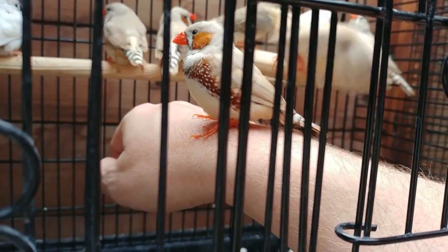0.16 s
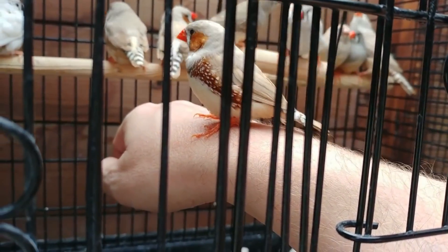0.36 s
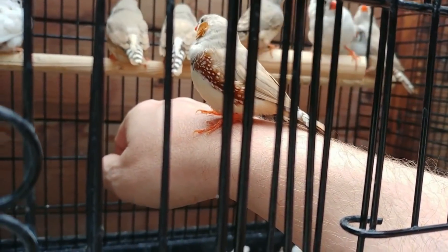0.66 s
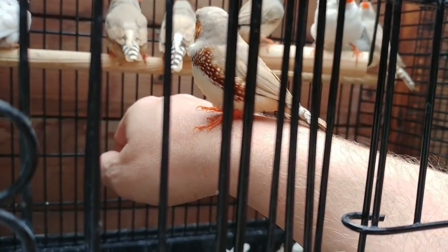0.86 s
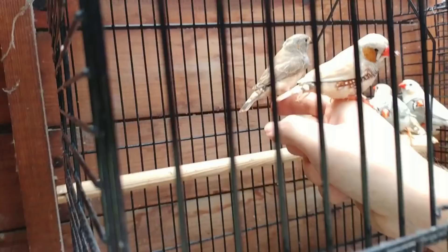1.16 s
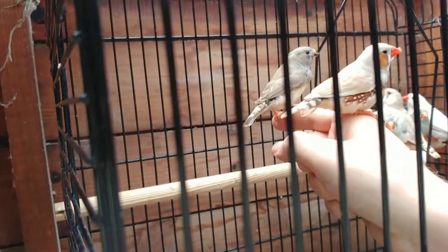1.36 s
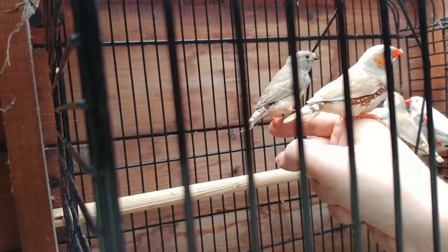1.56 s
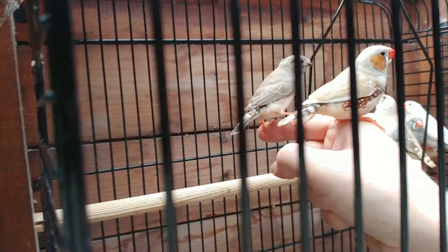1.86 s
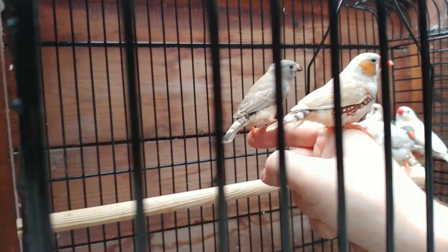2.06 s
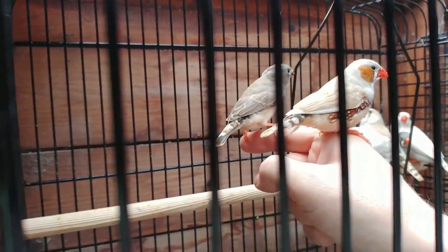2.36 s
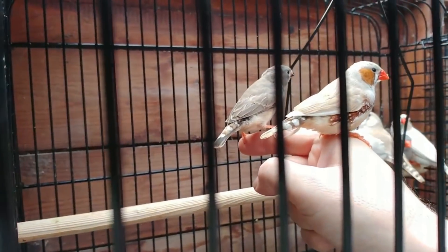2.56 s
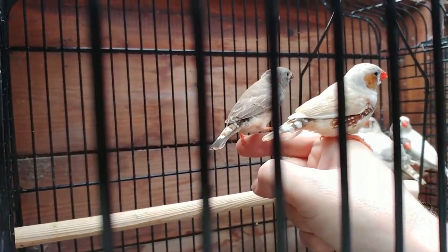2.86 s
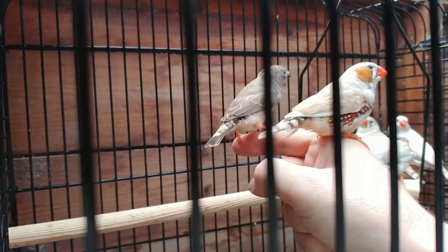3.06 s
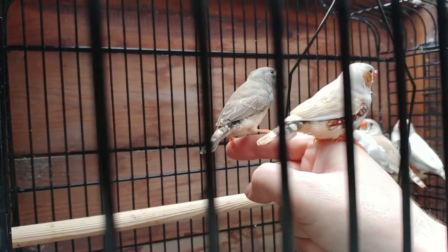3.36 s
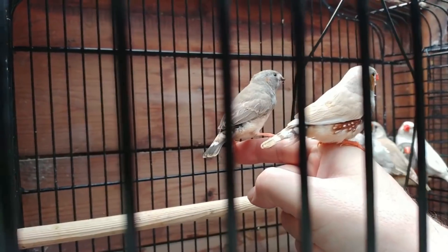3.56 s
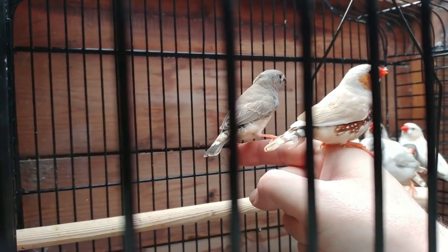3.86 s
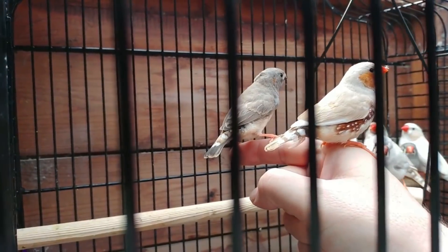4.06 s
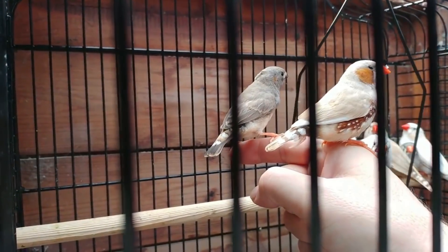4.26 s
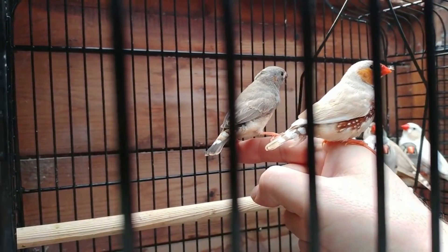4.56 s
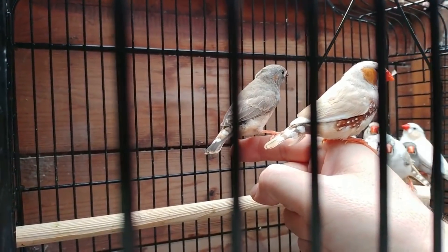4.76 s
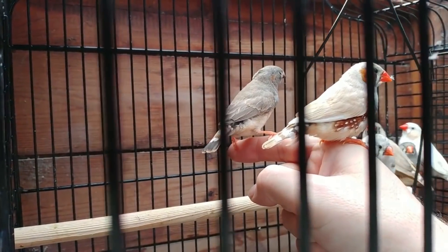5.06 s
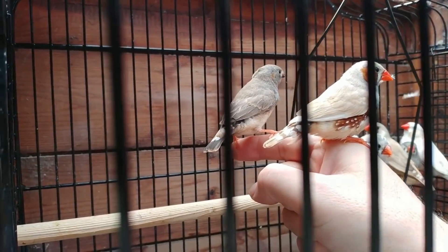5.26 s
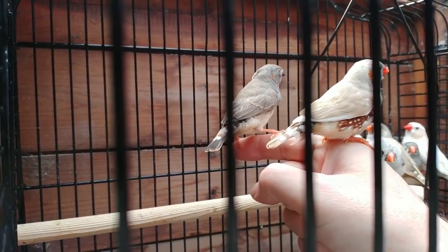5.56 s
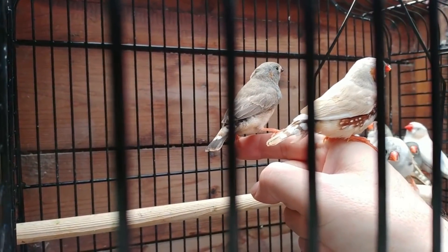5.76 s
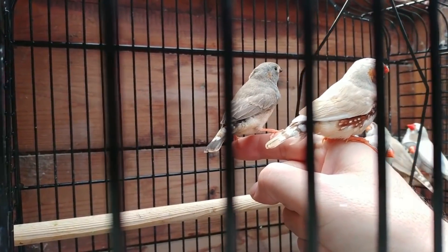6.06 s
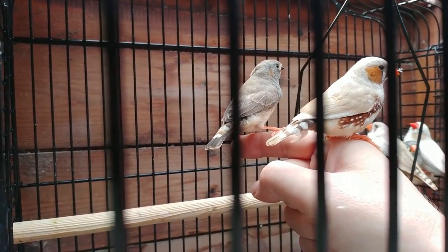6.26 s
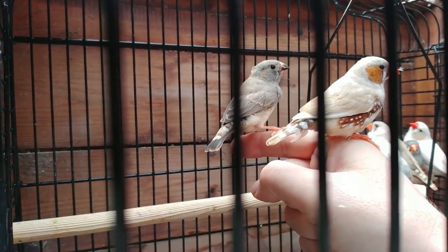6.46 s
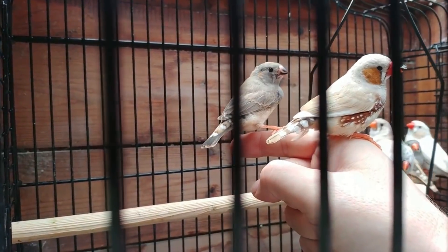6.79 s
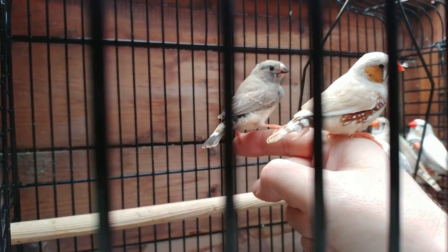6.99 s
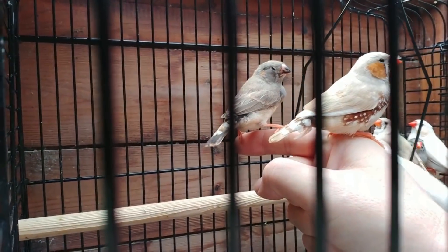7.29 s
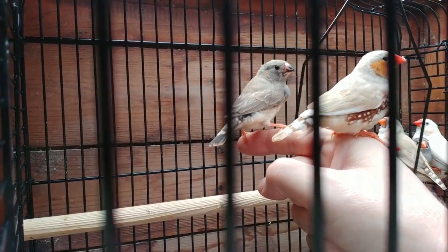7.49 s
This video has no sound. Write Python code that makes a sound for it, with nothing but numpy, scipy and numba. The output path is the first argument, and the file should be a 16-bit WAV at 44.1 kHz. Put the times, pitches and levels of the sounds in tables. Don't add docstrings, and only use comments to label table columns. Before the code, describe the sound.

Close-up zebra finches chatter in uneven bursts of short raspy calls and squeaks, over cage rattles and faint low room rumble.

```python
import sys
import numpy as np
from scipy import signal
from scipy.fft import rfft, irfft, next_fast_len
from scipy.io import wavfile
from numba import njit

SR = 44100
rng = np.random.default_rng(int(sys.argv[2]) if len(sys.argv) > 2 else 0)


def store_pcm(level_fs):
    pcm = np.round(np.clip(level_fs, -1, 1) * 32767).astype(np.int16)
    wavfile.write(sys.argv[1], SR, np.atleast_2d(pcm).T)


def magnitude_from_level(level_db):
    exponent = np.asarray(level_db, float) / 20
    return 10 ** exponent


N = 336483

# start in seconds, level in dB, syrinx pitch in Hz,
# throat resonance in Hz.
BEAT_CALLS = [(2.702, -31.5, 506.4, 2750), (2.836, -29, 656, 3060), (2.979, -26.5, 732.4, 2810),
              (3.123, -29.5, 661, 2730), (3.265, -30.5, 455.6, 3200), (3.401, -33.5, 579, 2590),
              (4.947, -40, 699.5, 2170), (5.111, -41.5, 608, 2080), (5.285, -40.5, 655.3, 2230),
              (5.424, -39, 673, 2300), (5.562, -37.5, 681, 2460), (5.697, -37.5, 673.6, 2600),
              (5.83, -34.5, 691, 2560), (5.966, -32, 813, 2800), (6.064, -40, 553, 2270),
              (6.106, -34.5, 723, 2470), (6.261, -28.5, 753, 3060), (6.388, -32, 624, 3220)]
# start in seconds, level in dB, syrinx pitch in Hz,
# throat at start in Hz, throat at end in Hz.
THROAT_SWEEPS = [
    (1.003, -41, 682, 2784, 1420),
    (1.253, -34.5, 709, 2666, 3467),
    (3.714, -40.5, 813, 2950, 4050),
    (3.848, -40, 792, 4500, 4400),
    (3.884, -28.5, 936, 3950, 3550),
    (3.903, -24.5, 936, 2950, 2800),
    (3.935, -29, 880, 2600, 1750),
    (4.23, -28, 700, 3100, 4450),
    (6.944, -31, 509.5, 4500, 3600),
    (6.99, -28, 859.5, 3300, 2900),
]
# start in seconds, length in seconds, level in dB, throat in Hz.
HALF_WHISTLED = [(0.63, .045, -20, 3800), (.625, 0.036, -28, 2700), (.77, .032, -23, 3100),
                 (0.66, 0.04, -32, 3750), (.728, .045, -30, 3080), (0.8, .04, -32, 3000),
                 (1.155, .04, -43.5, 2990), (2.125, .04, -28, 3850), (2.14, .045, -28, 3250),
                 (2.178, .055, -25, 3200), (2.952, .03, -41, 3086), (3.448, 0.034, -25, 4650),
                 (3.465, .043, -21, 3076), (7.083, .027, -42, 3130), (7.133, .045, -33, 2750),
                 (7.248, .035, -36, 3150), (7.534, .035, -34, 2900), (7.362, .035, -33.5, 2300),
                 (7.425, .03, -39.5, 3150), (7.49, 0.02, -27, 2950), (7.512, .025, -36.5, 3900),
                 (.583, .04, -38, 4800), (2.76, .03, -40, 3350), (2.8, .035, -43, 2600),
                 (3.404, .04, -39, 5600), (2.3, .03, -38, 4000)]
# start in seconds, length in seconds, level in dB, throat at start in Hz, at end in Hz.
HOARSE_CHATTER = [(0.929, .04, -63, 3360, 3270), (0.126, .05, -34.5, 2740, 2620),
                  (.268, .08, -31, 4400, 4200), (.584, 0.06, -29, 2300, 3200), (.74, .09, -37, 3300, 3000),
                  (2.112, .12, -33, 3400, 3000), (4.052, .045, -46, 2700, 2400),
                  (6.975, .09, -33, 3300, 3000), (1.226, 0.14, -40.5, 2220, 3550),
                  (1.546, .16, -44.5, 3020, 2190), (1.689, .08, -23, 3600, 4000),
                  (1.88, .045, -36.5, 4000, 3200), (1.994, .06, -42, 2300, 2700),
                  (2.03, .07, -36, 3900, 3000), (2.298, .044, -31.5, 3280, 2400),
                  (3.175, 0.039, -45.5, 3300, 2600), (7.186, 0.061, -41.5, 2530, 2730),
                  (7.353, 0.061, -29, 4470, 4404), (7.49, .04, -35.5, 2720, 3150),
                  (7.592, 0.03, -31, 3050, 2800)]
# start in seconds, length in seconds, level in dB, throat in Hz,
# extra beak in dB.
HARSH_SCREECHES = [
    (0.0, 0.12, -51, 2350, 5),
    (0.342, .068, -21, 3100, 4.5),
    (0.439, .092, -14.5, 3400, 4.5),
    (.262, .09, -29, 2800, -20),
    (6.418, 0.12, -44.5, 4000, -7.5),
    (7.306, 0.045, -28, 3070, -8),
]
# start in seconds, length in seconds, level in dB, throat in Hz,
# extra beak in dB.
SECOND_BIRD = [
    (2.335, 0.074, -18, 3750, 1),
    (2.377, 0.084, -21, 3523, -2.5),
    (2.487, 0.075, -21, 3440, -2.5),
    (2.534, 0.073, -22, 3365, -3),
]
# start in seconds, length in seconds, level in dB, syrinx pitch in Hz,
# throat in Hz.
OVERTONE_STACKS = [
    (.717, .056, -40, 780, 3660),
    (5.318, .06, -52.5, 506, 3860),
    (6.727, .22, -48, 546, 3600),
    (6.512, .05, -31, 525, 2800),
]
# start in seconds, length in seconds, level in dB, pitch at start in Hz, at end in Hz.
CLEAN_WHISTLES = [(0.0033, 0.082, -45.5, 850, 1414), (.118, 0.057, -50.5, 1407, 807),
                  (.233, 0.024, -41, 1620, 1595), (.183, .04, -40, 4450, 3900), (.2, .04, -36, 3800, 3200),
                  (.228, .065, -33, 3150, 3020), (4.14, .08, -66, 3450, 3450),
                  (1.234, .073, -45, 1950, 2270), (2.128, 0.038, -35, 2020, 1885),
                  (2.919, 0.023, -52, 4110, 3960), (6.506, 0.039, -48, 907, 1013),
                  (3.018, .051, -48.5, 2264, 1776), (3.16, 0.032, -46.5, 1960, 1806),
                  (3.323, 0.028, -46, 2760, 2786), (4.76, .06, -58, 3350, 3250),
                  (4.77, .04, -61, 4200, 4180), (4.83, .1, -60, 2950, 3350), (6.775, .13, -54, 915, 821),
                  (7.39, .04, -43, 4700, 4900), (7.446, .045, -46, 2600, 2670),
                  (7.535, .045, -37, 1530, 1753), (7.579, .055, -33.5, 1780, 2270),
                  (5.9, .1, -57.5, 880, 860), (6.19, .05, -56, 1630, 1677), (6.43, .045, -51, 3350, 3260),
                  (1.8, .055, -55, 3950, 4030)]
# start in seconds, length in seconds, level in dB,
# pitch at start in Hz, at end in Hz.
PINCHED_WHISTLES = [
    (6.655, .08, -51, 2500, 2740),
    (.79, .032, -47, 3830, 3760),
]
# start in seconds, length in seconds, level in dB, # pitch at start in Hz, at end in Hz.
BROKEN_WHISTLES = [(.722, .058, -38, 2350, 1950), (.72, .045, -37, 4600, 4500),
                   (.625, .055, -33, 8000, 7800), (.815, .05, -38, 2550, 2450),
                   (.845, .052, -33, 3050, 3150), (.795, .04, -36, 3650, 3850),
                   (2.088, .037, -31, 2644, 2516), (2.055, .04, -33, 4050, 3950),
                   (2.06, .045, -44, 8100, 7900), (2.725, .11, -50, 7850, 7750),
                   (3.875, .018, -40, 3000, 3000), (3.918, .035, -45, 6100, 5900),
                   (3.89, .03, -43, 7700, 7400), (4.25, .032, -36, 3450, 3550),
                   (4.9, .025, -58, 4900, 4850), (5.04, .07, -60, 4800, 4700), (5.05, .06, -59, 2600, 3000),
                   (6.943, .037, -30, 3300, 3230), (6.952, .04, -36, 2050, 1984),
                   (6.953, .04, -33, 4000, 3900), (6.972, .022, -24, 3500, 2750),
                   (6.99, .035, -19.5, 3050, 3600), (7.007, .042, -24.5, 2700, 2498),
                   (7.028, .048, -23, 3200, 3200), (7.004, .018, -38, 7000, 7100),
                   (7.015, .035, -42, 7750, 7700), (7.016, .02, -41, 5200, 4900),
                   (6.974, .014, -42, 7050, 7000)]
# start in seconds, peak in dB, ring in Hz, decay time (t60) in seconds.
WIRE_TAPS = [(.242, -57, 507, 0.023), (0.2837, -43, 496, 0.016), (.325, -41, 596, 0.036),
             (1.538, -26, 1260, 0.016), (1.547, -40, 895, 0.024), (1.624, -29, 900, 0.011),
             (4.05, -49.5, 689, .04), (1.853, -37, 8060, 0.029), (2.117, -29.5, 770, 0.018),
             (4.803, -33, 7420, 0.099), (5.401, -46.5, 690, 0.13), (6.627, -38.5, 7740, 0.024),
             (7.466, -37, 201, 0.031), (1.53, -43, 280, .08), (7.493, -36, 7000, .03)]
# start in seconds, length in seconds, panel buzz in dB, wing rustle in dB.
LANDINGS = [(0.251, 0.19, -46, -45), (0.405, 0.1, -42, -56.5), (0.77, 0.1, -34, -55),
            (0.822, .11, -29.5, -36), (1.151, 0.22, -52, -48), (1.496, 0.28, -53, -42),
            (2.072, .13, -49, -54), (3.517, 0.18, -28, -43), (3.653, .13, -41.5, -62.5),
            (4.248, 0.095, -72, -50), (6.83, 0.059, -52.5, -50), (7.39, 0.17, -46.5, -44),
            (7.509, 0.08, -47, -43)]
# pitch in Hz, level in dB, decay time (t60) in seconds.
PANEL_MODES = [(95, -11, 0.018), (198, 5, 0.072), (251.3, 2.5, 0.12), (271, -1, 0.095)]
# time in seconds, room rumble in dB, far flock in dB.
BACKGROUND = [(0.049, -52.5, -66), (0.33, -39.5, -55.5), (0.599, -47, -73), (0.95, -41, -70.5),
              (1.25, -48.5, -76.5), (1.47, -52.5, -72), (1.8, -47.5, -68), (2.3, -46.5, -71),
              (2.65, -56.5, -73.5), (3.201, -53.5, -71), (3.65, -48, -76), (4.5, -59, -80),
              (5.299, -54, -78), (6.2, -56.5, -70.5), (6.801, -51, -70), (7.2, -50, -72),
              (7.58, -42, -59.5)]
# frequency in Hz, level in dB.
RUMBLE_SPECTRUM = [(30, -31.5), (42, -10), (54, 1.5), (75, -4), (110, -10), (160, -15.5), (250, -17),
                   (420, -28.5)]
# frequency in Hz, level in dB.
RUSTLE_SPECTRUM = [(300, -1.5), (700, -.5), (1500, -3), (3000, -3), (6000, -7), (8000, -13.5), (15000, -19)]
# frequency in Hz, level in dB.
FAR_SPECTRUM = [(300, -2.5), (900, -2.5), (1700, -5), (3000, -3.5), (4700, -12), (6300, -13.5), (7800, -11),
                (9500, -19.5)]
# frequency in Hz, correlation (1 is the same on both sides).
PORT_LIKENESS = [(60, 0.96), (300, 0.85), (700, 0.24), (1400, 0.062)]
# frequency in Hz, gain in dB.
MICROPHONE_COLOUR = [(30, -11.5), (48, 0.5), (6800, -1), (7800, 2), (8800, -3), (9900, -21), (11500, -18.5),
                     (15500, -13)]
# frequency in Hz, left over right in dB.
LEFT_COLOUR = [(6000, 0), (8500, 2.5), (11500, -1)]

USUAL_DB = -31
BEAT = dict(rough=.38, rough_gain=.025, peak=.2, beak_hz=7900, beak_db=-19, beak_gain=.6,
            width_hz=900, width_gain=.045, chest_db=4, rise=.8)
SWEEP = dict(rough=.28, rough_gain=.008, peak=.35, beak_hz=7700, beak_db=-31, beak_gain=.6,
             width_hz=280, width_gain=0)
CHIRP = dict(rough=.48, rough_gain=.006, peak=.35, beak_hz=7800, beak_db=-30, beak_gain=.5,
             width_hz=330, width_gain=0)
CHAT = dict(rough=.65, rough_gain=.015, peak=.45, beak_hz=7770, beak_db=-14.5, beak_gain=.26,
            width_hz=780, width_gain=0)
SCREECH = dict(rough=.75, rough_gain=0, peak=.42, beak_hz=5800, beak_db=0, beak_gain=0,
               width_hz=560, width_gain=0, rise=1.5)
SHRIEK = dict(SCREECH, beak_hz=6700, beak_follows=1)
STACK = dict(rough=.1, rough_gain=0, peak=.25, beak_hz=5000, beak_db=-21, beak_gain=-.8,
             width_hz=1350, width_gain=-.028)

PORT_LAG_S, PORT_LEFT_DB = .00041, 4
SIDE_SPREAD_DB, LAG_SPREAD_S = 2, .00018


def calls():
    birds = flock()
    out = np.zeros((2, N))
    chance = rng.standard_normal((len(birds), 3, 13000))
    small_body = signal.butter(2, 1000, "high", fs=SR, output="sos")
    for bird, (noise, hiss, scatter) in zip(birds, chance):
        s, length, db, hz, start_hz, end_hz, open_db, voice = bird
        effort = db - USUAL_DB
        rough = np.clip(voice["rough"] + voice["rough_gain"] * max(effort, -4.0), 0, 1)
        peak = np.clip(voice["peak"], .2, .9)
        beak_db = voice["beak_db"] + voice["beak_gain"] * effort + open_db
        width_hz = voice["width_hz"] * np.exp(voice["width_gain"] * effort)

        n = round(.95 * length * SR)
        u = np.arange(n) / n
        glide_hz = start_hz + (end_hz - start_hz) * u
        bend = glide_hz / glide_hz.mean()
        pitch_hz = hz * (1.03 - .07 * u) * bend ** .3
        cycles = np.cumsum(pitch_hz) / SR
        whole = cycles.astype(int)
        closing = np.diff(np.floor(cycles + .16 * rough * scatter[whole]), prepend=0) > 0
        pulses = unit_rms(closing * magnitude_from_level(3.9 * rough * scatter[6000 + whole]))
        puffs = 0.41 + np.exp(-3.0 * (cycles % 1))
        source = np.sqrt(1 - rough ** 2) * pulses + rough * unit_rms(noise[:n] * puffs)

        phase, strength = warble(glide_hz, hiss[:n], .025, 5.0)
        tone = 1.4 * strength * (np.sin(phase) + 0.07 * np.sin(2 * phase))
        pure = np.clip(1.3 - width_hz / 500, 0, .9)
        throat = np.sqrt(1 - pure ** 2) * tract(source, glide_hz, 1.92 * width_hz, skirt_db=-24.0)
        throat = throat + pure * tone

        chest_gain = width_hz / 1000 * magnitude_from_level(voice.get("chest_db", -2) - .6 * effort)
        chest = chest_gain * tract(source, 1250 + 0 * u, 1400, skirt_db=-30.5)

        beak_hz = voice["beak_hz"] * bend ** voice.get("beak_follows", 0)
        beak_width_hz = 350 + width_hz / 2 + 105 * max(beak_db + 11, 0)
        beak = tract(source + 1.3 * hiss[:n] * puffs, beak_hz, beak_width_hz, skirt_db=-17.0)

        upper = signal.sosfilt(small_body, throat + magnitude_from_level(beak_db) * beak)
        sound = upper + magnitude_from_level(-13 - 3.8 * max(db + 26.5, 0)) * chest
        pressure = swell(n, peak, voice.get("rise", 1.1), 0.85)
        aside = 0 if voice is BEAT else abs(scatter[-1])
        add(out, magnitude_from_level(db - 2.36) * pressure * sound, s, 4.0, aside)
    return out


def flock():
    chirp_own, chat_own = np.exp(.15 * rng.standard_normal((2, 30)))
    birds = [(s, .05, db, hz, top, .95 * top, 0, BEAT) for s, db, hz, top in BEAT_CALLS]
    for s, db, hz, a, b in THROAT_SWEEPS:
        length = .04 + abs(b - a) / 38000
        birds.append((s, length, db, hz, a, b, 0, SWEEP))
    for (s, d, db, a), own in zip(HALF_WHISTLED, chirp_own):
        birds.append((s, d, db, 773 * own, a, a, 0, CHIRP))
    for (s, d, db, a, b), own in zip(HOARSE_CHATTER, chat_own):
        birds.append((s, d, db, 826 * own, a, b, 0, CHAT))
    sag = np.sqrt(.88)
    for rows, voice in ((HARSH_SCREECHES, SCREECH), (SECOND_BIRD, SHRIEK)):
        birds += [(s, d, db, 614.6, a / sag, a * sag, beak, voice) for s, d, db, a, beak in rows]
    return birds + [(s, d, db, hz, a, a, 0, STACK) for s, d, db, hz, a in OVERTONE_STACKS]


@njit
def resonate(x, turn, r):
    y = np.zeros(len(x))
    for i in range(2, len(x)):
        push = (1 - r * r) / 2 * (x[i] - x[i - 2])
        y[i] = push + 2 * r * np.cos(turn[i]) * y[i - 1] - r * r * y[i - 2]
    return y


def tract(x, hz, width_hz, skirt_db):
    turn = 2 * np.pi * np.clip(hz, 300, 12000) / SR
    r = np.exp(-np.pi * max(width_hz, 80) / SR)
    once = resonate(x, turn, r)
    return unit_rms(resonate(once, turn, r) + magnitude_from_level(skirt_db) * once)


def warble(hz, wobble, pitch_shake, shake_db):
    shake = unit_rms(signal.lfilter([1], [1, -1.94, .9412], wobble))
    strength = magnitude_from_level(shake_db * np.roll(shake, len(hz) // 2))
    return 2 * np.pi * np.cumsum(hz * (1 + pitch_shake * shake)) / SR, unit_rms(strength)


def swell(n, peak, rise, fall):
    u = np.arange(n) / n
    return np.where(u < peak, (u / peak) ** rise, ((1 - u) / (1 - peak)) ** fall)


def add(out, sound, s, pan_db, aside=0):
    lean_db = pan_db + SIDE_SPREAD_DB * (aside - .5)
    for side, lag, sign in ((0, PORT_LAG_S - LAG_SPREAD_S * aside, 1), (1, 0, -1)):
        i = max(round((s + lag) * SR), 0)
        out[side, i:i + len(sound)] += magnitude_from_level(sign * lean_db / 2) * sound[:N - i]


def whistles():
    clean_shake, broken_shake = (.0092, 3.4), (.013, 5.5)
    rows = [(*row, 10, clean_shake) for row in PINCHED_WHISTLES]
    rows += [(*row, -34, broken_shake) for row in BROKEN_WHISTLES]
    for s, length, db, a, b in CLEAN_WHISTLES:
        over_db = min(5 - 15 * np.log2((a + b) / 2380.0), -4.0)
        rows.append((s, length, db, a, b, over_db, clean_shake))
    out, chance = np.zeros((2, N)), rng.standard_normal((len(rows), 8000))
    for (s, length, db, start_hz, end_hz, over_db, shake), wobble in zip(rows, chance):
        n = round(length * SR)
        glide_hz = start_hz + (end_hz - start_hz) * (np.arange(n) / n) ** .7
        phase, strength = warble(glide_hz, wobble[:n], *shake)
        tone = np.sin(phase) + magnitude_from_level(over_db) * np.sin(2 * phase)
        tone = tone + magnitude_from_level(1.3 * over_db - 4) * np.sin(3 * phase)
        add(out, magnitude_from_level(db) * swell(n, 0.6, 0.3, 0.35) * strength * tone, s, 3.5)
    return out


def treble_swell(near):
    band = signal.butter(2, [4500, 9000], "band", fs=SR, output="sos")
    treble = signal.sosfilt(band, near.mean(axis=0))
    smooth = signal.butter(2, 60, fs=SR, output="sos")
    return magnitude_from_level(-10) * np.abs(signal.sosfilt(smooth, np.abs(treble)))


def taps():
    out, cracks = np.zeros((2, N)), rng.standard_normal((len(WIRE_TAPS), 4000))
    for (s, db, hz, t60), crack in zip(WIRE_TAPS, cracks):
        dying = crack * magnitude_from_level(-60 * np.arange(4000) / SR / t60)
        band = signal.butter(2, [0.67 * hz, 1.28 * hz], "band", fs=SR, output="sos")
        body = signal.sosfilt(band, dying)
        add(out, magnitude_from_level(db) * body / abs(body).max(), s, 3.5)
    return out


def cage():
    beats = np.cumsum(85 * (1 + 0.14 * drift(20))) / SR
    slaps = (np.diff(np.floor(beats), prepend=0) > 0) * magnitude_from_level(2.8 * rng.standard_normal(N))
    slaps = slaps * shaking(np.array(LANDINGS)[:, 2])
    buzz = sum(magnitude_from_level(level_db - 6) * ring(slaps, hz, t60) for hz, level_db, t60 in PANEL_MODES)
    return buzz * magnitude_from_level(np.array([[1], [-1]]) * 1.3)


def ring(clicks, hz, t60):
    r, w = magnitude_from_level(-60 / (t60 * SR)), 2 * np.pi * hz / SR
    return signal.lfilter([0, np.sin(w)], [1, -2 * r * np.cos(w), r * r], clicks + 1e-18)


def shaking(levels_db):
    out = np.zeros(N + SR)
    for (s, length, *_), db in zip(LANDINGS, levels_db):
        i, n = round(s * SR), round(length * SR)
        out[i:i + n] += magnitude_from_level(db) * swell(n, 0.26, 1.4, 0.89)
    return out[:N]


def wing_rustle():
    return shaking(np.array(LANDINGS)[:, 3]) * banded_noise(RUSTLE_SPECTRUM, 299.5, 20000, patchy_db=4.0, count=1)


def room(x):
    t = np.arange(SR // 4) / SR
    t60_s, wall_cut_hz = 0.085, 5400
    echoes = rng.standard_normal((2, len(t))) * magnitude_from_level(-60 * t / t60_s) * np.clip(t / 0.0015, 0, 1)
    echoes = signal.sosfilt(signal.butter(1, wall_cut_hz, fs=SR, output="sos"), echoes)
    echoes = echoes / np.sqrt(np.sum(echoes ** 2, axis=1, keepdims=True))
    return signal.oaconvolve(x, echoes, axes=1)[:, :N]


def far_flock(far_db):
    return magnitude_from_level(far_db + 13.5) * banded_noise(FAR_SPECTRUM, 325.0, 14000, patchy_db=5.2)


def room_rumble(rumble_db):
    return magnitude_from_level(rumble_db - 1.5) * banded_noise(RUMBLE_SPECTRUM, 28, 460, patchy_db=1.5)


def top_hiss():
    high = signal.butter(4, 10500, "high", fs=SR, output="sos")
    return signal.sosfilt(high, rng.standard_normal((2, N)))


def banded_noise(spectrum, low_hz, high_hz, patchy_db, count=2):
    out, together = 0, drift(2.9)
    edges = low_hz * 2 ** np.arange(0, np.log2(high_hz / low_hz), 1 / count)
    white = rng.standard_normal((2, 2, N))
    for k, (low, high) in enumerate(zip(edges, edges[1:])):
        band = signal.butter(2, [low, high], "band", fs=SR, output="sos")
        mid, side = signal.sosfilt(band, white[k % 2])
        hz = np.sqrt(low * high)
        alike = np.clip(at_hz(PORT_LIKENESS, hz), -1, 1)
        gain = magnitude_from_level(at_hz(spectrum, hz) + patchy_db * (0.46 * together + drift(13.6)))
        out = out + gain * (np.sqrt(1 + alike) * mid + np.sqrt(1 - alike) * side * [[1], [-1]])
    return unit_rms(out) * magnitude_from_level(np.array([[1], [-1]]) * PORT_LEFT_DB / 2)


def drift(rate):
    r = np.exp(-80 * np.pi * rate / SR)
    slow = signal.lfilter([1], [1, -2 * r, r * r], rng.standard_normal(N // 40 + 2002))[2000:]
    return np.interp(np.arange(N) / 40, np.arange(len(slow)), unit_rms(slow))


def unit_rms(x):
    return x / np.sqrt(np.mean(x ** 2) + 1e-20)


def at_hz(points, hz):
    points = np.array(points)
    return np.interp(np.log(hz), np.log(points[:, 0]), points[:, 1])


def scene():
    s, rumble_db, far_db = np.transpose(BACKGROUND)
    rumble_db, far_db = (np.interp(np.arange(N) / SR, s, c) for c in (rumble_db, far_db))
    near = calls() + whistles() + taps()
    air = (magnitude_from_level(-59 + 0.55 * (far_db + 76.5)) + treble_swell(near)) * top_hiss()
    echoes = magnitude_from_level(-6) * room(near)
    return near + echoes + cage() + wing_rustle() + far_flock(far_db) + room_rumble(rumble_db) + air


def treble_dropouts(x):
    hz, _, frames = signal.stft(x, SR, nperseg=1024)
    call_band = (hz > 2000) & (hz < 9000)
    power = np.sum(np.abs(frames[:, call_band]) ** 2, axis=(0, 1))
    loud = 10 * np.log10(power + 1e-20) > -47
    patch_rows = (hz / 345).astype(int)
    patch_columns = np.arange(len(loud)) // 3
    dice = rng.random((80, len(loud) // 3 + 1))[patch_rows][:, patch_columns]
    share = np.where((hz > 9700) & (hz < 11200), .85, .45) * (hz > 9200)
    holes = loud & (dice < share[:, None])
    return signal.istft(frames * ~holes, SR, nperseg=1024)[1][:, :N]


def top_cut(x):
    return signal.sosfilt(signal.butter(12, 15800, fs=SR, output="sos"), x)


def record(dry):
    size = next_fast_len(N)
    bins = np.arange(size // 2 + 1)
    table_hz = (bins + 1) * SR / size
    colour = magnitude_from_level(at_hz(MICROPHONE_COLOUR, table_hz))
    colour = colour * magnitude_from_level(at_hz(LEFT_COLOUR, table_hz) * [[.5], [-.5]])
    colour = colour * (bins * SR / size < 15800)
    overloaded = np.tanh(dry / 1.5) * 1.65
    heard = treble_dropouts(irfft(rfft(overloaded, size) * colour, size)[:, :N])
    t = np.arange(N) / SR
    mix = heard * np.where((t > 1.311) & (t < 1.4425), 3e-4, 1)
    return top_cut(mix)


dry = scene()
out = record(dry)
store_pcm(out)
```